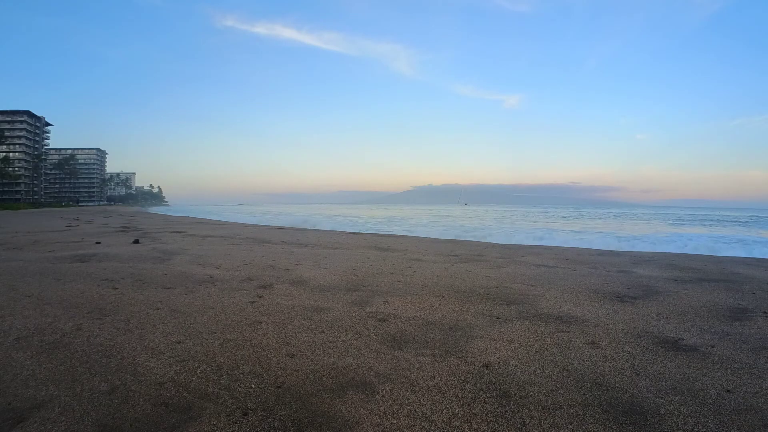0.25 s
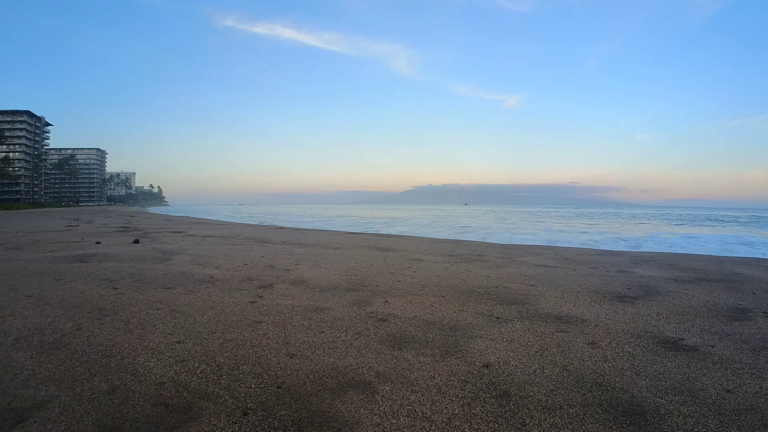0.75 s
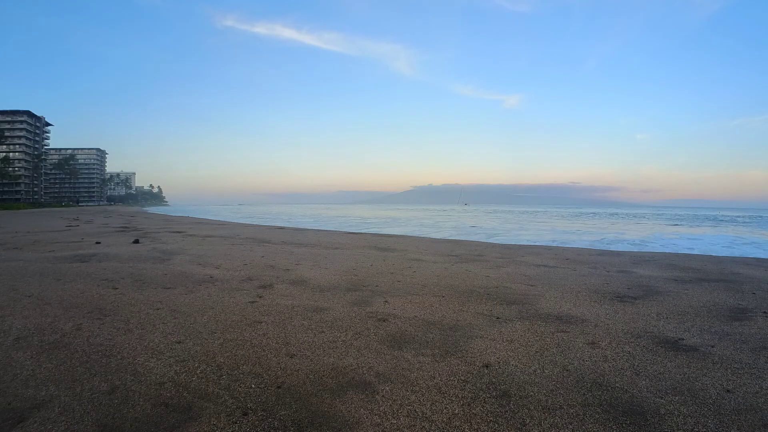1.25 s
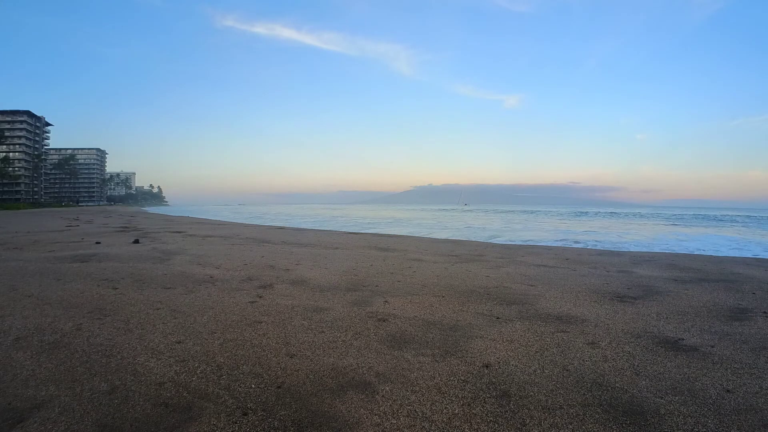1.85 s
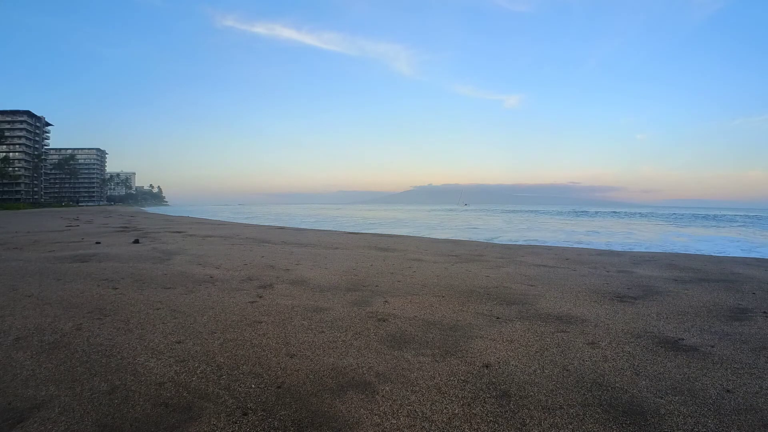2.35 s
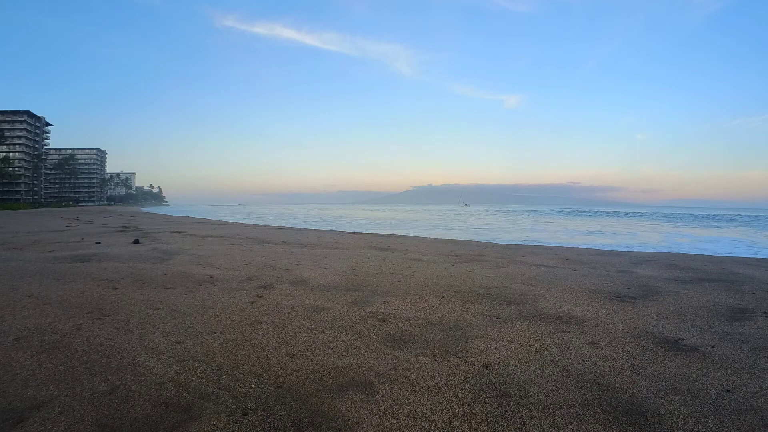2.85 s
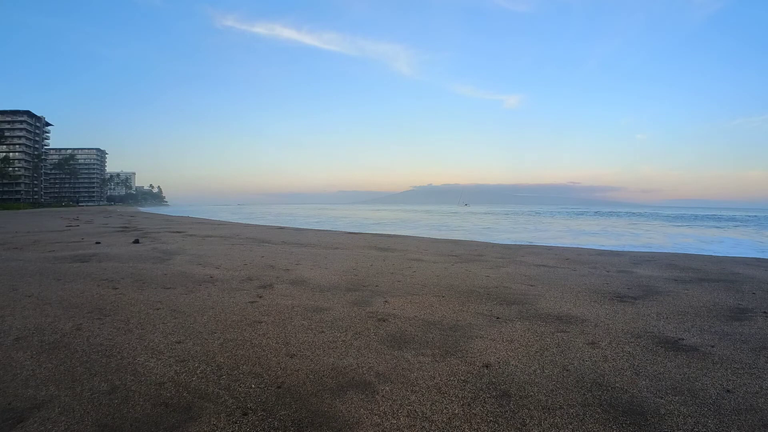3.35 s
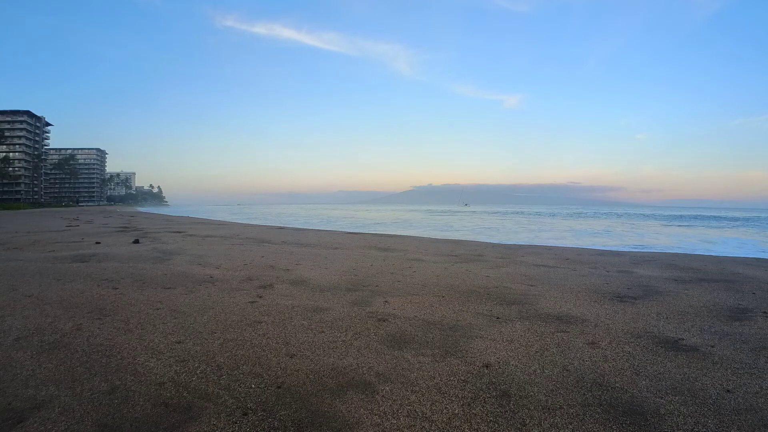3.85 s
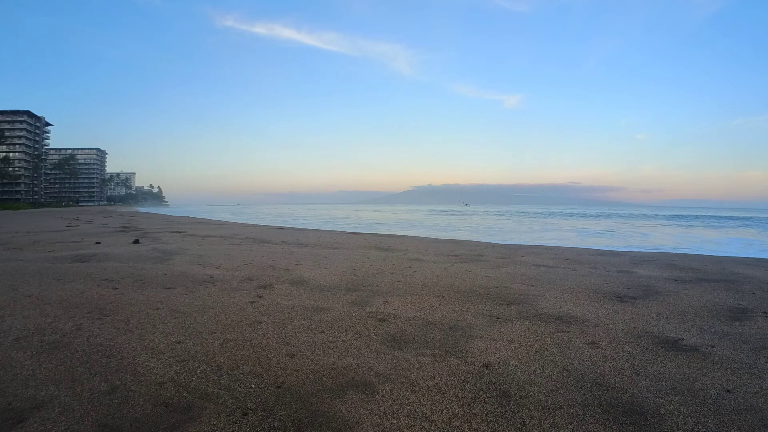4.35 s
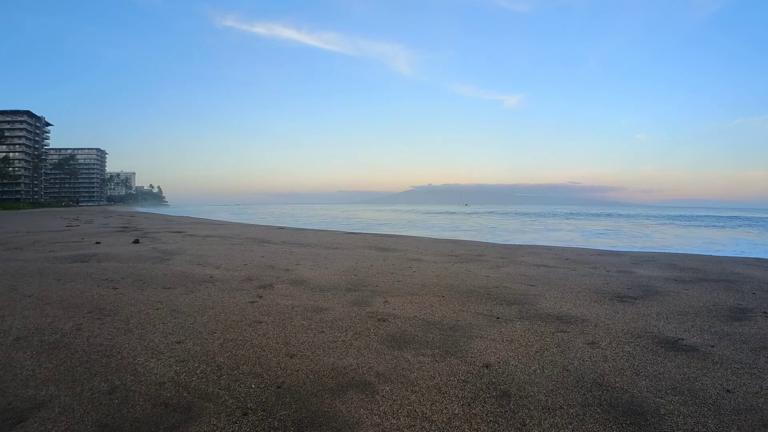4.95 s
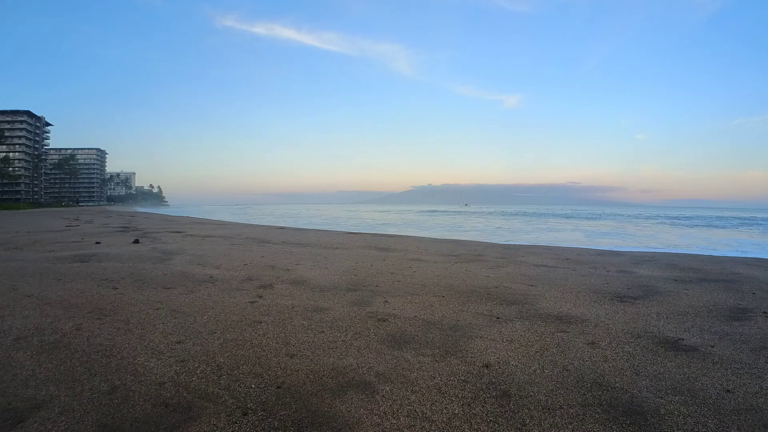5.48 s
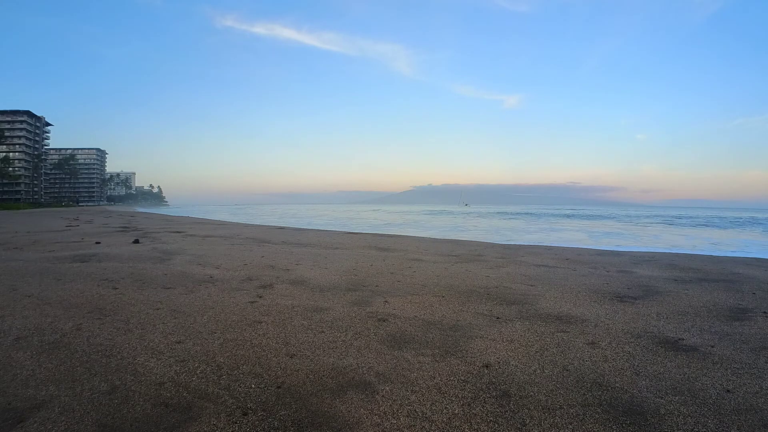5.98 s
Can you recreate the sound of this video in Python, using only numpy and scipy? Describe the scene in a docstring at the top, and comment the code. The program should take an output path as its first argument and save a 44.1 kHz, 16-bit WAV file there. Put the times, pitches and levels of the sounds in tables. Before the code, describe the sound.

A wave breaks close by on an open sand beach with a roar and a low boom, then runs up the sand in fizzing foam. As it fades, thin backwash trickles away and quieter surf keeps rumbling along the shore. Distant birds whistle, rasp and twitter with a slight echo from buildings. Near the end, the next small wave begins to build.

```python
"""A wave roars and booms close by, collapses on a sand beach and runs out in fizzing foam.
Trapped air makes the roar, large air pockets the boom, small ringing bubbles the fizz.
As the backwash trickles away, surf keeps rumbling along the shore and distant birds whistle,
rasp and twitter, echoing off buildings behind the beach. Then the next small wave starts to spill."""
import sys
import numpy as np
from scipy import signal
from scipy.fft import rfft, irfft, next_fast_len
from scipy.io import wavfile
from scipy.ndimage import uniform_filter1d, map_coordinates

SR = 44100
rng = np.random.default_rng(int(sys.argv[2]) if len(sys.argv) > 2 else 0)


def bounce(signal):
    """Save signal as a 16-bit WAV file at the path given by the first command-line argument."""
    frames = np.transpose(np.atleast_2d(signal))
    limited = np.clip(frames, -1, 1)
    pcm = np.round(limited * 32767).astype(np.int16)
    wavfile.write(sys.argv[1], SR, pcm)


N = 274302
COLLAPSE_S = 1.122


def near_wave():
    """The wave churns at full strength, sags, collapses, runs out and soaks into the sand."""
    hold_s, collapse_length_s, soak_s = 0.19, 0.094, 2.3
    sag_db = 7 * (since(hold_s) - since(COLLAPSE_S))
    collapse_db = 3 * np.minimum(since(COLLAPSE_S) / collapse_length_s, 1)
    runout_db = 10 * since(COLLAPSE_S)
    spent_db = sag_db + collapse_db + runout_db
    return amp(-7 * since(soak_s)) * (roar(spent_db) + boom(spent_db) + foam(spent_db))


# The body of the wave: freq_hz, gain_db
ROAR_EQ = [(30, -45), (60, -18), (105, -0.5), (170, -5.5), (250, 2.5), (380, 1.5), (550, -2), (800, -4),
           (1300, -9.5), (2500, -35), (6000, -84)]
def roar(spent_db):
    """Trapped air roars and gulps in the collapsing water."""
    gulps = bubbles(count=2200, centre_hz=559, spread=1.077, cycles=1.04, scatter_db=2.5)
    level_db = -30.5 - 0.88 * spent_db + 0.65 * wobble(14.52)
    return amp(level_db) * coloured(churn(patchy_db=-1.9) + amp(-13.5) * gulps, ROAR_EQ)


# The low end of the wave: freq_hz, gain_db
BOOM_EQ = [(25, -38), (38, -37), (52, -18), (75, -7), (110, 0), (145, 1.5), (215, 4), (290, -14),
           (600, -9.5), (1500, -59.5), (9000, -100)]
def boom(spent_db):
    """Large air pockets swell as the heaviest water plunges; they break up first, so the boom dies fast."""
    plunge_db = 2.5 * swell(peak_s=0.29, rise_s=0.06, fall_s=0.06)
    return amp(-31.5 + plunge_db - 1.75 * spent_db) * coloured(churn(patchy_db=-1.0), BOOM_EQ)


# Bright, fresh foam: freq_hz, gain_db
FOAM_EQ = [(40, -60), (300, -25), (900, 0), (1500, 3.5), (2500, 1), (4000, -3), (6100, -4), (7300, -13.5),
           (10000, -27), (12500, -36.5), (13600, -44), (14600, -58)]
def foam(spent_db):
    """Small bubbles fizz up the sand, turning duller as the finest spray settles after the collapse."""
    fizz = bubbles(count=6000, centre_hz=3310, spread=1.0, cycles=10.3, scatter_db=3.5)
    fresh = coloured(churn(patchy_db=0.5) + amp(-18.5) * fizz, FOAM_EQ)
    settled = filtered(fresh, lambda hz: 1 / np.sqrt(1 + (hz / 7200) ** 10))
    spray = amp(-10 * since(COLLAPSE_S))
    level_db = -38.5 - spent_db + 0.3 * wobble(13.76)
    return amp(level_db) * (spray * fresh + (1 - spray) * settled)


# Thin water running over sand: freq_hz, gain_db
BACKWASH_EQ = [(60, -50), (550, -19), (820, -2), (1400, -4), (2200, -11), (4000, -12), (5600, -7),
               (9000, -30), (13000, -56)]
def backwash(drain_s=3.55, drain_db_per_s=7.5):
    """The spent water trickles back down the sand and drains away."""
    trickle = bubbles(count=1500, centre_hz=1499, spread=0.457, cycles=10.0, scatter_db=4)
    water = coloured(churn(patchy_db=3.5) + amp(-5.0) * trickle, BACKWASH_EQ)
    return amp(-66.5 - drain_db_per_s * since(drain_s)) * water


# The low bed of surf: freq_hz, gain_db
RUMBLE_EQ = [(25, -37), (42, -45), (65, -10.5), (105, 2), (160, -1), (215, 2.5), (300, -2.5), (420, -7),
             (700, -18), (1500, -65), (9000, -100)]
# Farther breakers landing: peak_s, level_db
BREAKER_THUMPS = [(2.21, -45), (2.52, -51.5), (3.05, -62), (4.02, -52), (4.51, -50), (4.77, -49.5),
                  (5.06, -55), (5.45, -54), (5.63, -54)]
def surf_rumble(settled_s=2.92):
    """Breakers rumble and thump along the shore, louder at first while the same wave breaks farther off."""
    bed = amp(-53 + 4 * until(settled_s) + 0.27 * wobble(26))
    thumps = sum(amp(db) * swell(peak_s, rise_s=0.06, fall_s=0.065) for peak_s, db in BREAKER_THUMPS)
    return np.hypot(bed, thumps) * coloured(churn(patchy_db=1.0), RUMBLE_EQ)


# The midrange rush of surf: freq_hz, gain_db
SPILL_EQ = [(40, -56), (150, -19.5), (400, 4), (650, 2.5), (1000, -5.5), (1400, -20), (2200, -36),
            (5000, -49), (14000, -68)]
def surf_spill(settled_s=2.37, next_wave_s=5.3):
    """Spilling crests ease to a steady rush, then build slowly with the next wave."""
    level_db = -58 + 9.5 * until(settled_s) + 2.6 * since(next_wave_s) + 0.4 * wobble(11)
    return amp(level_db) * coloured(churn(patchy_db=1.5), SPILL_EQ)


# The hollow tone of a slosh: freq_hz, gain_db
SLOSH_EQ = [(100, -50), (450, -3.5), (820, 3.5), (1100, -6), (1500, -19), (3000, -42), (9000, -100)]
# Small crests tipping over: peak_s, half_length_s, level_db
CREST_SLOSHES = [(2.68, 0.17, -61), (3.356, 0.035, -59.5), (3.635, .07, -64), (4.13, 0.11, -61),
                 (4.404, 0.038, -60), (4.643, 0.048, -59.5), (4.73, 0.04, -59), (5.05, 0.12, -66)]
def sloshes():
    """Small crests slosh over along the shore, each a short swell of noise."""
    envelope = sum(amp(db) * swell(peak_s, half_s, half_s) for peak_s, half_s, db in CREST_SLOSHES)
    return envelope * coloured(churn(patchy_db=2.0), SLOSH_EQ)


# The muffled hiss of the incoming crest: freq_hz, gain_db
CREST_EQ = [(40, -60), (250, -10), (480, 1), (800, -1), (1200, 0), (1450, -9), (2000, -22), (4000, -35),
            (9000, -70)]
def next_crest(arrival_s=6.22, rise_db_per_s=30):
    """The next wave starts to foam, still dull with distance."""
    return amp(-57 - rise_db_per_s * until(arrival_s)) * coloured(churn(patchy_db=1.5), CREST_EQ)


# The main call, a warbled whistle and a steep downward sweep (levels before the mix):
# start_s, length_s, pitch_hz, warble_depth_hz, whistle_db, sweep_start_s, top_hz, end_hz, sweep_db
BIRD_CALLS = [ (2.132, 0.068, 3095, 130, -57.5, 2.205, 4400, 2600, -59.5),
              (2.753, 0.05, 3090, 100, -58.5, 2.822, 5540, 2100, -57.8),
              (3.6, 0.064, 3040, 30, -62, 3.677, 4220, 2140, -62),
              (4.243, 0.066, 2990, 90, -61.5, 4.308, 5120, 1700, -59.5)]
# Short clear notes (levels before the mix): start_s, length_s, pitch_hz, slide_hz, arch_hz, level_db
BIRD_PIPS = [ (2.647, 0.089, 2960, 200, 100, -64), (3.043, .038, 4560, -300, 70, -63.5),
             (3.287, .027, 3480, 290, 50, -62), (3.547, 0.031, 2660, -150, 50, -62),
             (3.746, 0.04, 2804, 200, -150, -54.5), (3.786, 0.037, 2965, 2, 50, -63),
             (4.404, 0.02, 3360, -120, 0, -65.5), (4.430, 0.024, 3170, 100, 0, -68),
             (4.535, .03, 6200, 400, 50, -77), (4.745, 0.037, 5530, 150, 50, -78),
             (5.285, .04, 5200, -200, 50, -77), (5.353, .05, 3360, 350, -80, -74),
             (5.370, 0.032, 4330, 100, 50, -77), (5.558, 0.023, 3720, -100, 50, -73),
             (5.750, .04, 5500, -200, 50, -77), (5.875, 0.032, 5060, 0, 50, -81),
             (6.155, .028, 3500, -100, 50, -75)]
# Falling notes, mostly hoarse (levels before the mix):
# start_s, length_s, top_hz, drop_octaves, level_db, rasp_0_to_1
BIRD_SLURS = [ (2.503, 0.069, 4650, 0.31, -66, 0.5), (2.585, .07, 3950, .15, -70, .3),
              (2.695, .05, 2650, .25, -66, .4), (3.132, 0.096, 4700, 0.45, -68.5, 1),
              (3.340, 0.022, 2950, .25, -68, .4), (3.362, .04, 2050, 0.31, -61, 0.52),
              (3.612, 0.048, 4850, 0.4, -62, .32), (3.648, 0.039, 5500, .2, -68, 0.8),
              (3.814, .045, 2850, .2, -68, .6), (3.946, 0.071, 2680, 0.25, -65.5, 0.44),
              (4.007, 0.052, 2400, .4, -66, .9), (4.182, 0.045, 2900, 0.43, -64, 0.5)]
def songbird(sweep_octaves_per_s=25):
    """The nearest bird repeats its whistle-and-sweep call, with pips and hoarse slurs in between."""
    notes = [pip(*row) for row in BIRD_PIPS] + [slur(*row) for row in BIRD_SLURS]
    for start_s, length_s, hz, warble_hz, whistle_db, sweep_s, top_hz, end_hz, sweep_db in BIRD_CALLS:
        octaves = np.log2(top_hz / end_hz)
        notes.append(pip(start_s, length_s, hz, slide_hz=70, arch_hz=0, db=whistle_db, warble_hz=warble_hz))
        notes.append(slur(sweep_s, octaves / sweep_octaves_per_s, top_hz, octaves, sweep_db, rasp=.6))
    return whistles(notes)


def pip(start_s, length_s, hz, slide_hz, arch_hz, db, warble_hz=0, rasp=.2):
    """A clear note that slides through its pitch in an arch or a dip."""
    glide_hz = hz - (slide_hz + arch_hz) / 2, hz + arch_hz / 2, hz + (slide_hz - arch_hz) / 2
    return start_s, length_s, glide_hz, db, rasp, warble_hz


def slur(start_s, length_s, top_hz, octaves, db, rasp):
    """A note that drops evenly through its interval."""
    glide_hz = top_hz, top_hz / 2 ** (octaves / 2), top_hz / 2 ** octaves
    return start_s, length_s, glide_hz, db, rasp, 0


def whistles(notes, warbles_per_s=35):
    """Sines glide through a start, middle and end pitch; fast flutter smears the harsh ones into a rasp."""
    song = np.zeros(N + SR)
    for start_s, length_s, glide_hz, db, rasp, warble_hz in notes:
        size = int(length_s * SR)
        progress = np.linspace(0, 1, size)
        glide = np.polyval(np.polyfit([0, .5, 1], glide_hz, 2), progress)
        warble = -warble_hz * np.cos(2 * np.pi * warbles_per_s * length_s * progress)
        hz = glide + warble + rasp * 520 * wobble(1100, size)
        # louder at the top of each warble, so the whistle breaks into syllables
        tremolo_db = .025 * warble + 4 * rasp * wobble(300, size)
        envelope = np.abs(np.sin(np.pi * progress)) ** .6 * amp(tremolo_db)
        tone = np.sin(2 * np.pi * np.cumsum(hz) / SR)
        song[round(start_s * SR):][:size] += amp(db) * unit(envelope * tone)
    return song[:N]


# Bouts of far chirping (levels before the mix):
# start_s, end_s, chirp_count, pitch_hz, log_pitch_spread, loudest_db, fade_db_per_s
TWITTER_BOUTS = [ (2.3, 4.45, 76, 2150, .42, -69.5, 0), (2.3, 3.9, 40, 3400, .32, -72, 0),
                 (2.2, 4.0, 100, 5650, .17, -73.7, 0), (4.0, 6.1, 72, 5800, .13, -74.5, 3.7),
                 (4.0, 5.2, 36, 2700, .5, -75.5, 3), (5.1, 6.1, 12, 3000, .4, -81, 0)]
def twitter(rasp=.33):
    """Farther birds scatter faint, short chirps of random pitch, slant and strength."""
    flock = np.zeros(N)
    for start_s, end_s, count, centre_hz, spread, loudest_db, fade_db_per_s in TWITTER_BOUTS:
        jitter, length, pitch, slant, softness = rng.random((count, 5)).T
        onset_s = start_s + (end_s - start_s) * (np.arange(count) + jitter) / count
        length_s = .016 + .03 * length
        hz = centre_hz * np.exp(spread * (2 * pitch - 1))
        bend_hz = 0.16 * (slant - .5) * hz
        glides_hz = zip(hz + bend_hz, hz, hz - bend_hz)
        level_db = loudest_db - 7 * softness - fade_db_per_s * (onset_s - start_s)
        flock += whistles((*chirp, rasp, 0) for chirp in zip(onset_s, length_s, glides_hz, level_db))
    return flock


def facades(x, t60_s, echo_db):
    """The buildings behind the beach return a few early echoes and a soft tail."""
    t = np.arange(SR) / SR
    tail = rng.standard_normal(SR) * amp(-60 * t / t60_s) * (1 - np.exp(-t / 0.076))
    tail /= np.linalg.norm(tail)
    echo_s = rng.uniform(.003, .025, size=6)
    tail[(echo_s * SR).astype(int)] += amp(echo_db)
    return signal.fftconvolve(x, tail)[:N]


# Open-air ambience: freq_hz, gain_db
AIR_EQ = [(500, 11), (1800, 5.5), (3500, 5.5), (4600, 0.5), (6000, 2.5), (7300, -6.5), (10000, -13),
          (13000, -42)]
def air():
    """A faint, steady hiss over the open beach."""
    return amp(-72.5) * coloured(churn(patchy_db=0.0), AIR_EQ)


def churn(patchy_db):
    """White noise whose gain drifts in patches of time and frequency."""
    spectrogram = signal.stft(rng.standard_normal(N), nperseg=1024)[2]
    patches = rng.standard_normal(spectrogram.shape)
    for axis in (0, 1):
        patches = uniform_filter1d(patches, size=7, axis=axis)
    return unit(signal.istft(spectrogram * amp(patchy_db * unit(patches)), nperseg=1024)[1][:N])


def bubbles(count, centre_hz, spread, cycles, scatter_db):
    """A cloud of damped rings: a few loud among many quiet, each rising a little in pitch."""
    when, pitch, size = rng.random((count, 3)).T
    hz = centre_hz * np.exp(spread * (2 * pitch - 1))
    gain = amp(-scatter_db * np.log(1 - size * .99))
    turns = hz[:, None] * np.arange(700) / SR
    age = turns / cycles
    rings = gain[:, None] * np.exp(-age) * np.sin(2 * np.pi * turns * (1 + .02 * age))
    samples = (when * N).astype(int)[:, None] + np.arange(turns.shape[1])
    return unit(np.bincount(samples.ravel(), rings.ravel(), N)[:N])


def coloured(x, eq):
    """x through an EQ curve drawn on a log frequency axis, at rms 1."""
    freq_hz, gain_db = np.transpose(eq)
    return unit(filtered(x, lambda hz: amp(np.interp(np.log(hz + 1), np.log(freq_hz), gain_db))))


def filtered(x, response):
    """x through a filter whose gain is response(hz)."""
    size = next_fast_len(N + 8192)
    return irfft(rfft(x, size) * response(np.fft.rfftfreq(size, 1 / SR)), size)[:N]


def wobble(knots_per_s, size=N):
    """A smooth random curve."""
    knots = rng.standard_normal(int(size * knots_per_s / SR) + 4)
    return map_coordinates(knots, [np.arange(size) * knots_per_s / SR])


def swell(peak_s, rise_s, fall_s):
    """A bell-shaped envelope that peaks at 1."""
    return np.exp(-(until(peak_s) / rise_s) ** 2 - (since(peak_s) / fall_s) ** 2)


def since(s):
    """Seconds gone by since s at each sample, 0 before it."""
    return np.maximum(np.arange(N) / SR - s, 0)


def until(s):
    """Seconds left until s at each sample, 0 after it."""
    return np.maximum(s - np.arange(N) / SR, 0)


def amp(db):
    """Decibels to gain."""
    return 10 ** (np.asarray(db) / 20)


def unit(x):
    """Scale to rms 1."""
    return x / np.sqrt(np.mean(x ** 2) + 1e-20)


def scene():
    """Water, air and birds in mono; the farther birds carry more reflection."""
    beach = near_wave() + backwash() + surf_rumble() + surf_spill() + sloshes() + next_crest() + air()
    flock = twitter()
    song = songbird()
    near_bird = amp(-2.3) * song + amp(-11) * facades(song, t60_s=.36, echo_db=-7)
    far_birds = amp(-2) * flock + amp(-7) * facades(flock, t60_s=.4, echo_db=-9)
    return (beach + near_bird + far_birds)[None]


def record(dry):
    """A brick-wall high cut takes off the very top."""
    return filtered(dry[0], lambda hz: hz < 14600)[None]


dry = scene()
out = record(dry)
bounce(out)
```